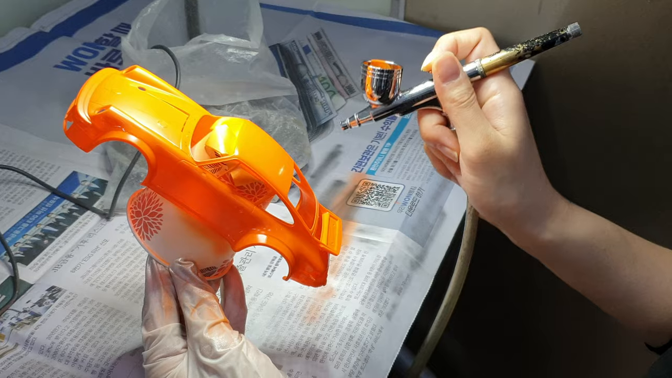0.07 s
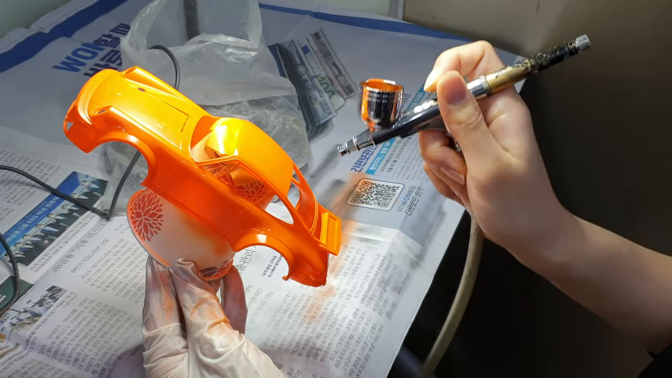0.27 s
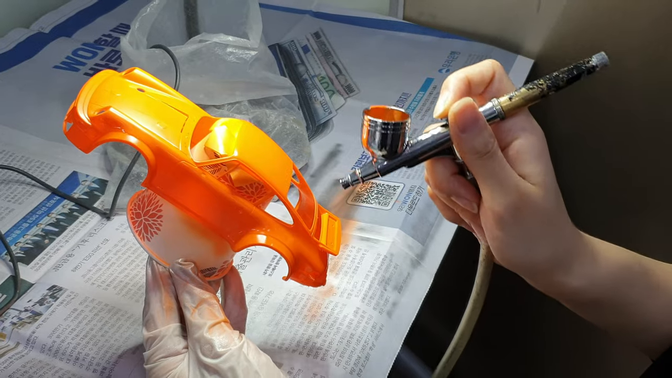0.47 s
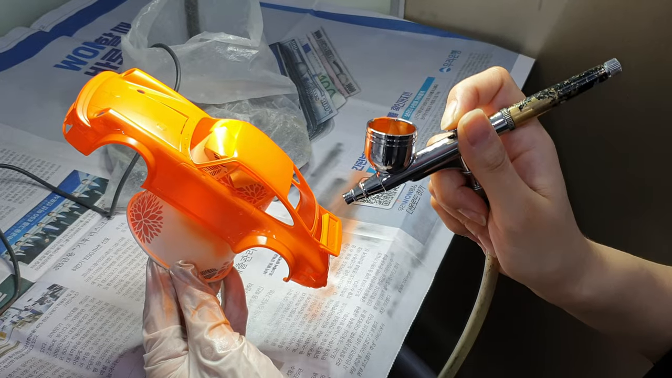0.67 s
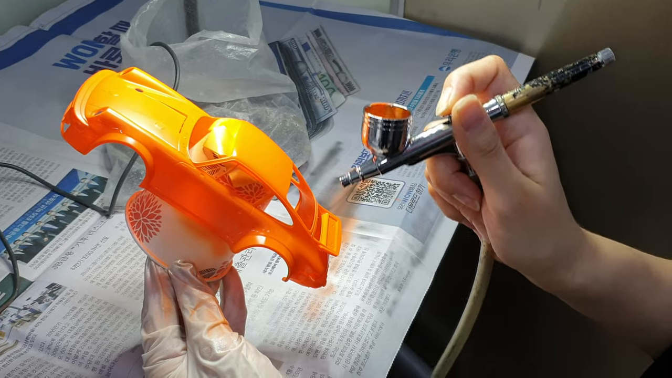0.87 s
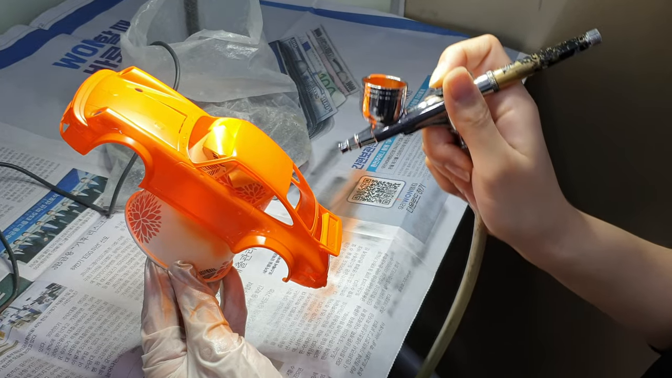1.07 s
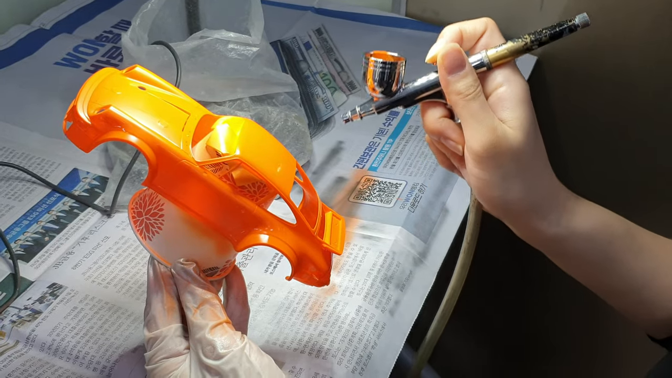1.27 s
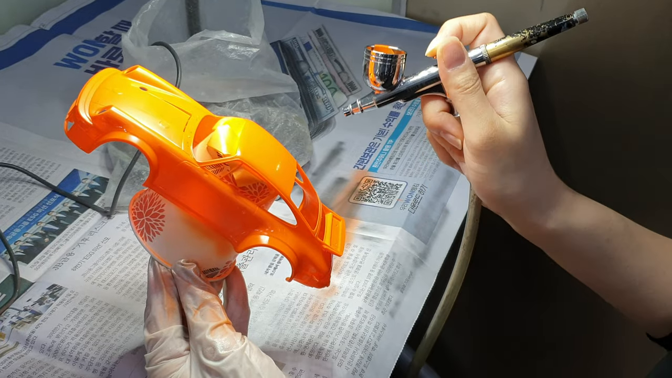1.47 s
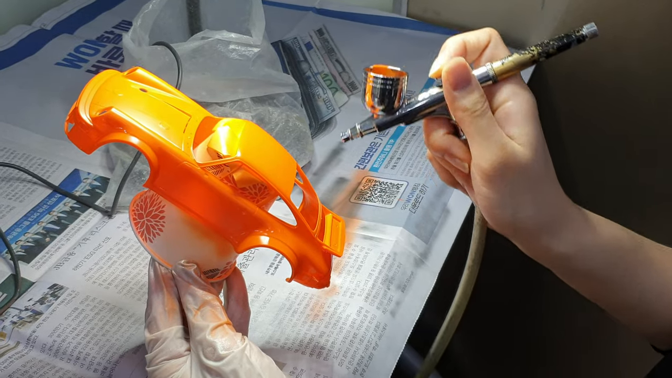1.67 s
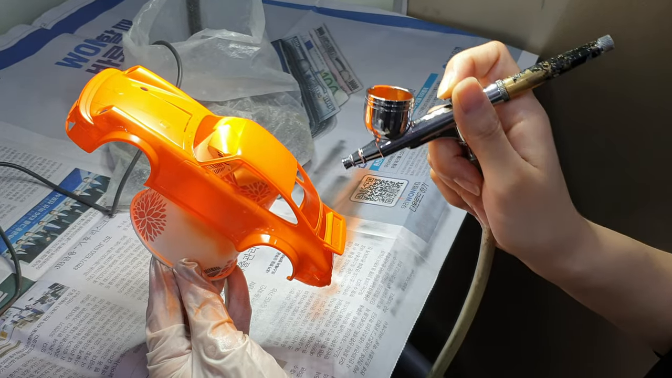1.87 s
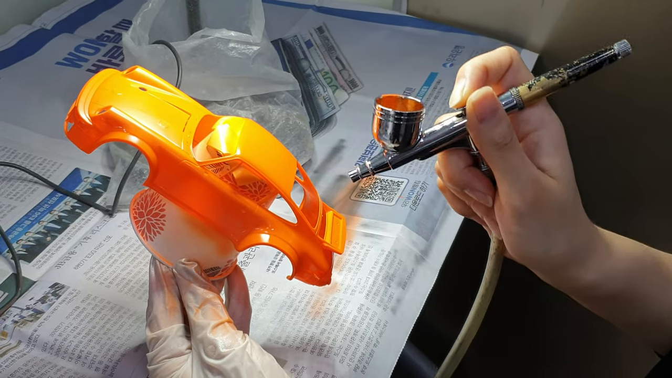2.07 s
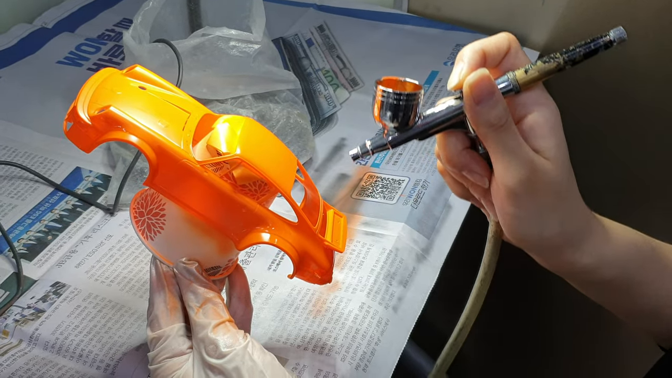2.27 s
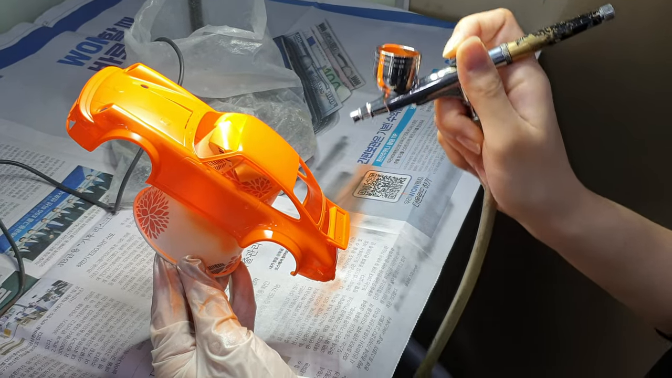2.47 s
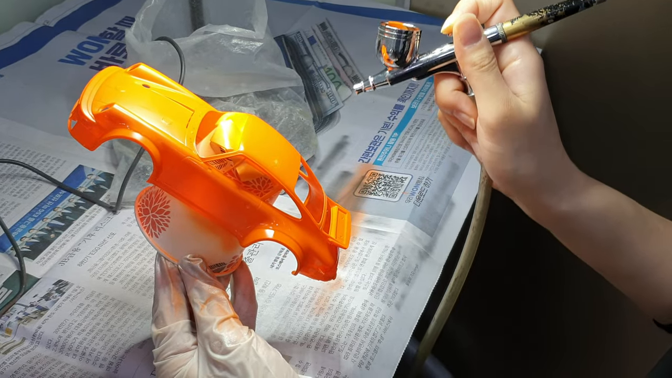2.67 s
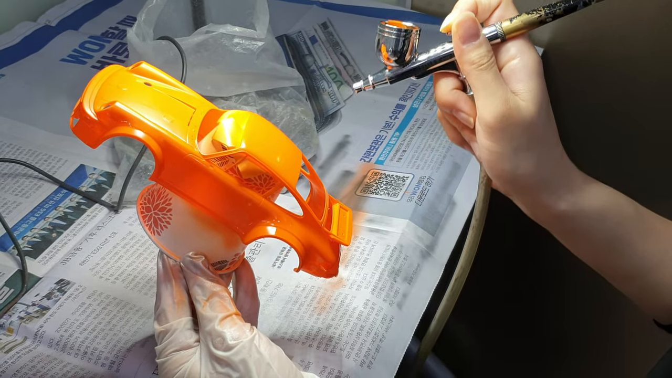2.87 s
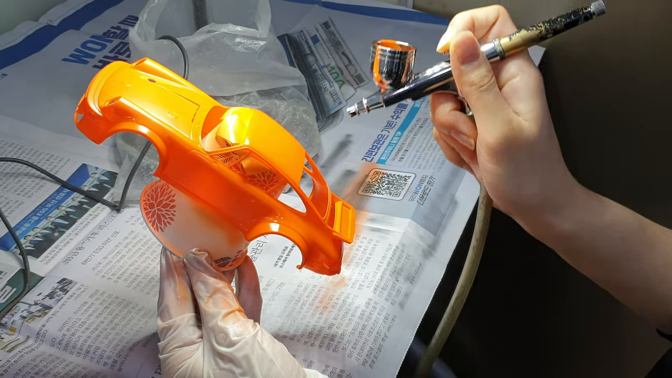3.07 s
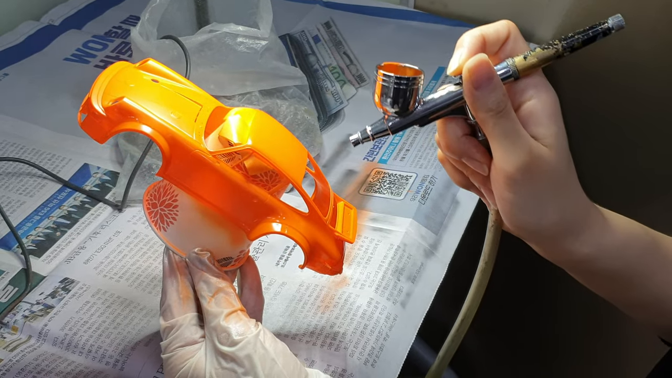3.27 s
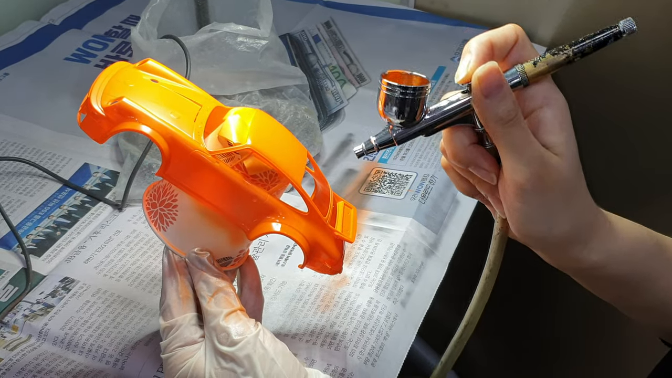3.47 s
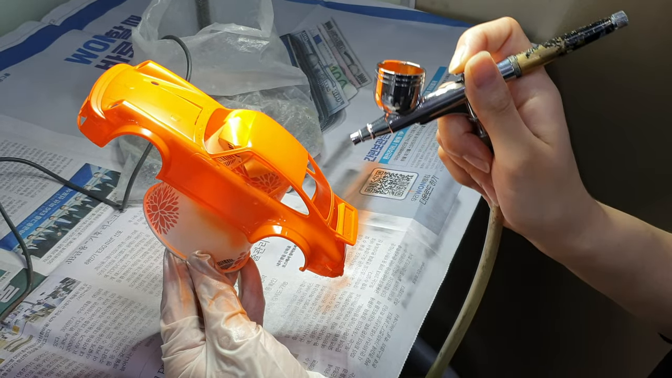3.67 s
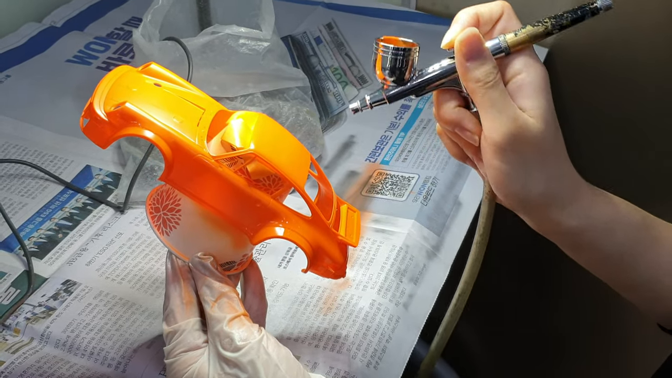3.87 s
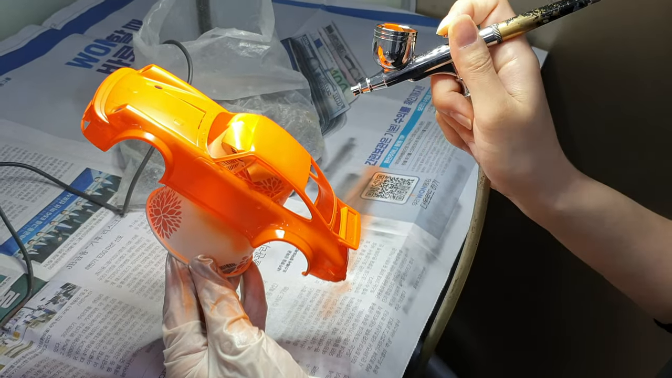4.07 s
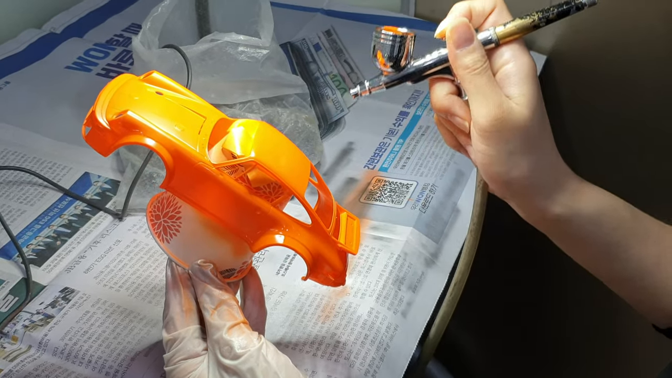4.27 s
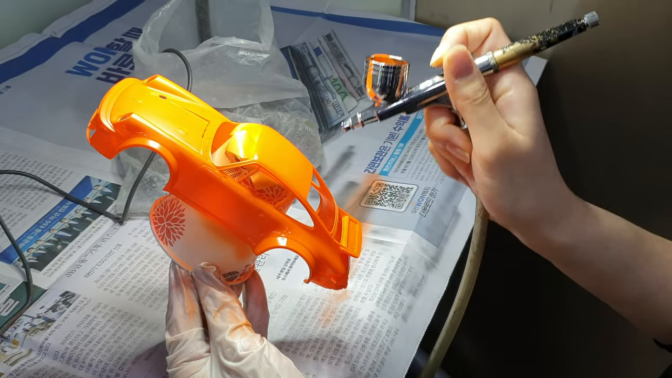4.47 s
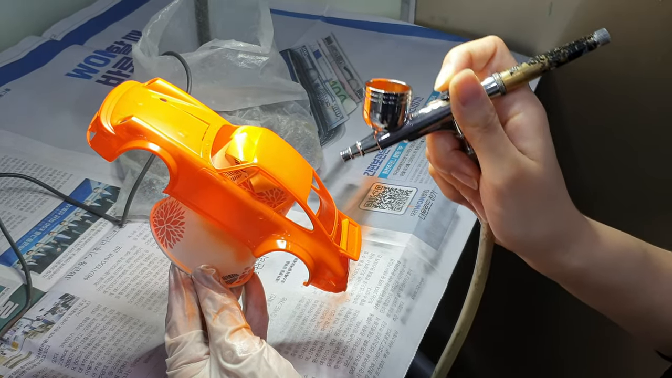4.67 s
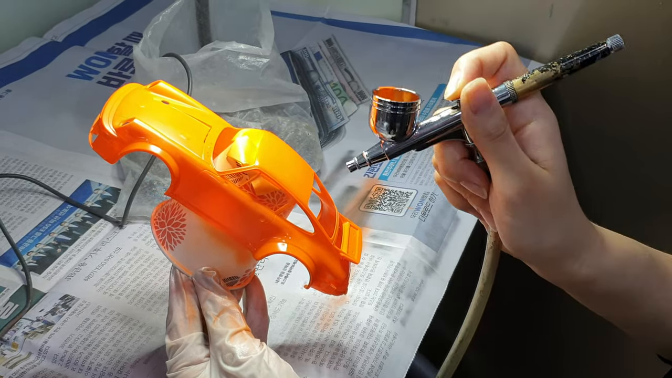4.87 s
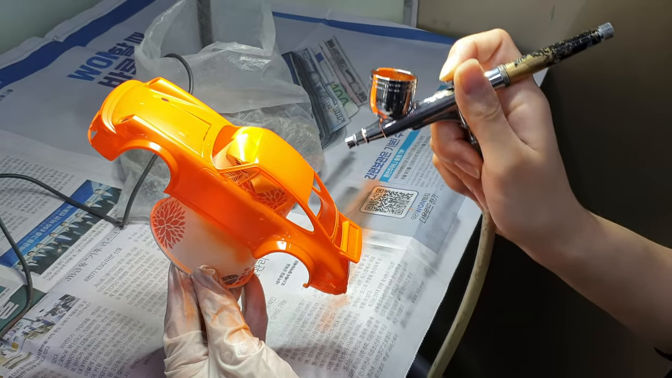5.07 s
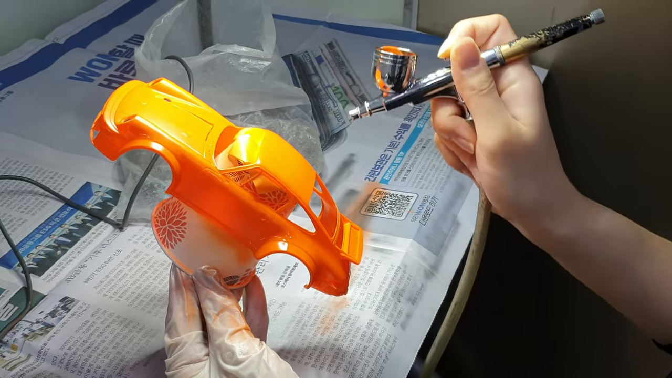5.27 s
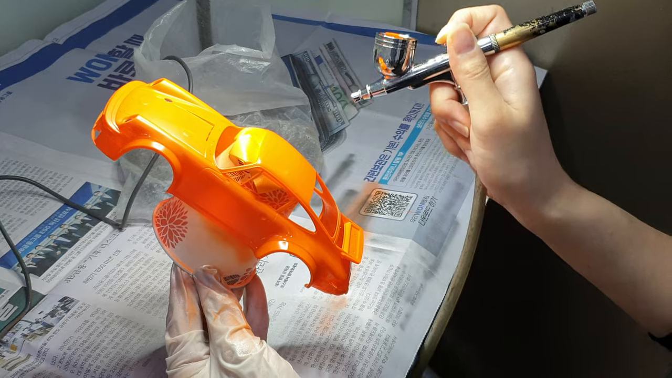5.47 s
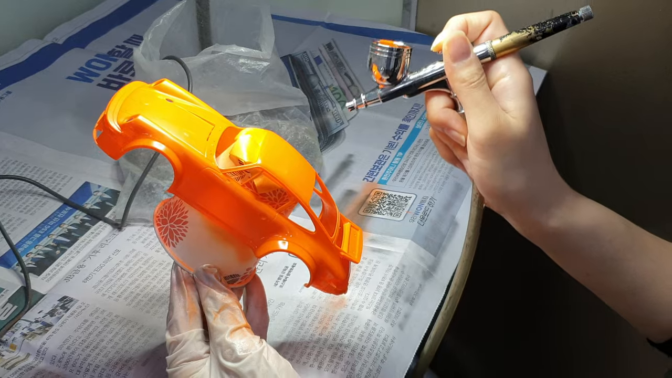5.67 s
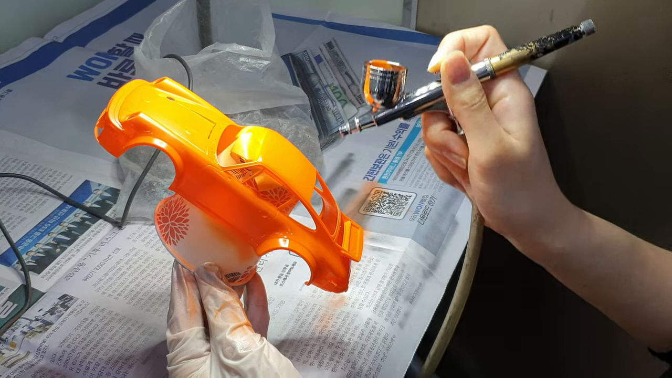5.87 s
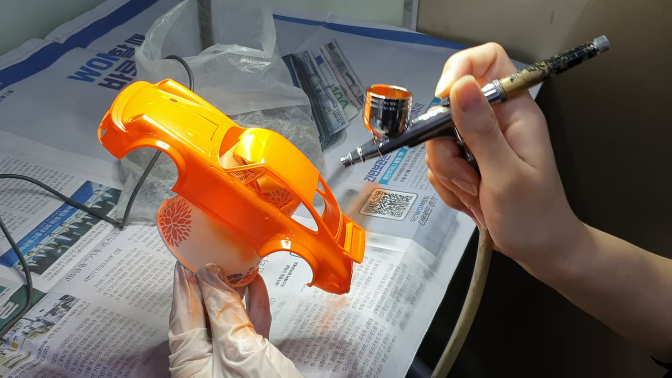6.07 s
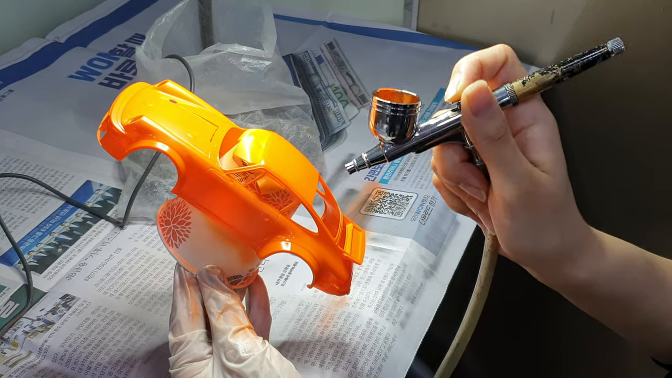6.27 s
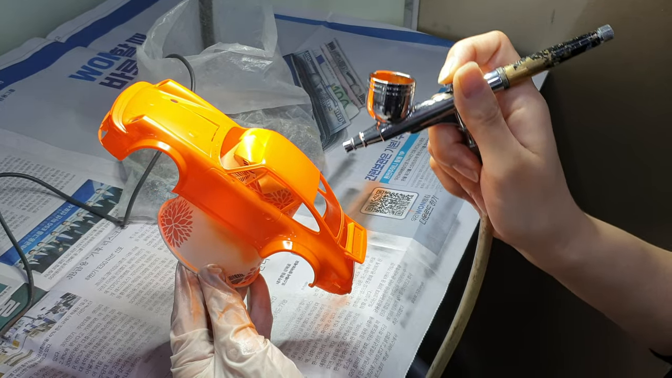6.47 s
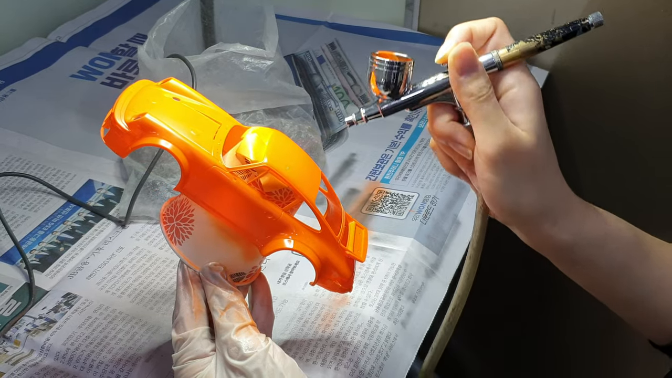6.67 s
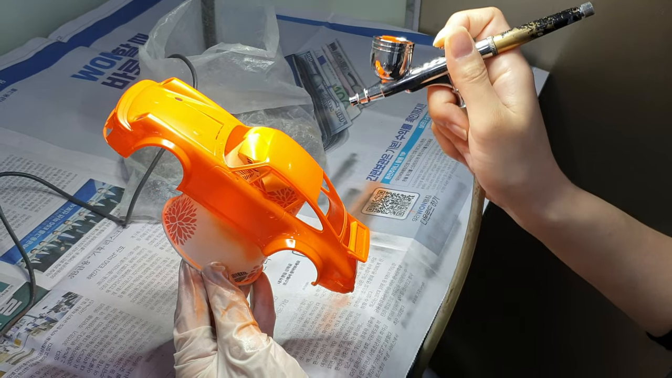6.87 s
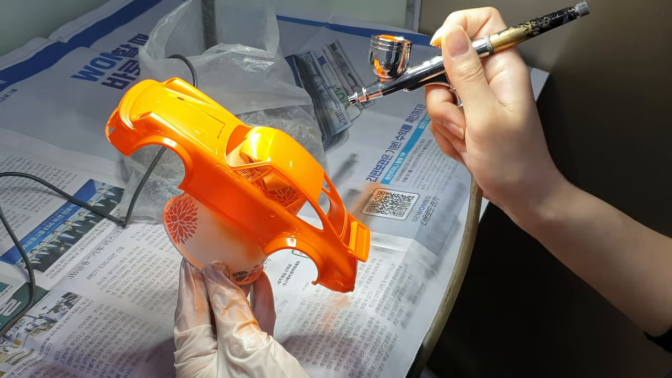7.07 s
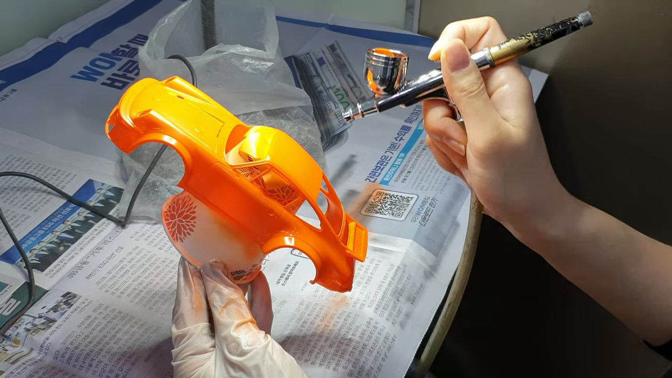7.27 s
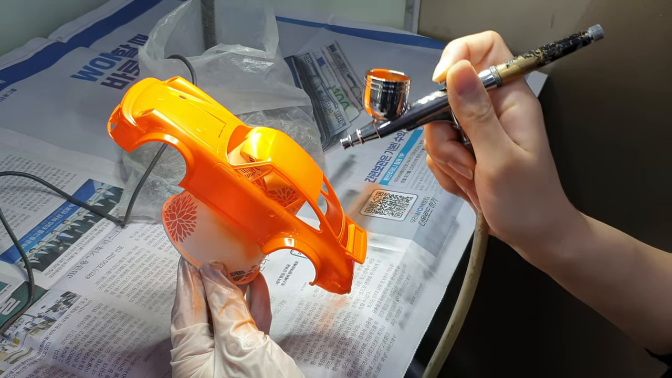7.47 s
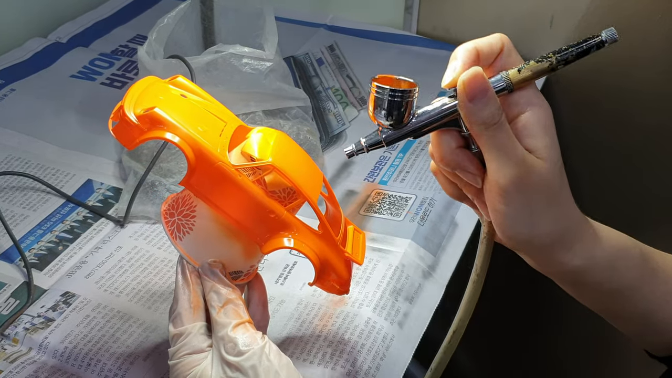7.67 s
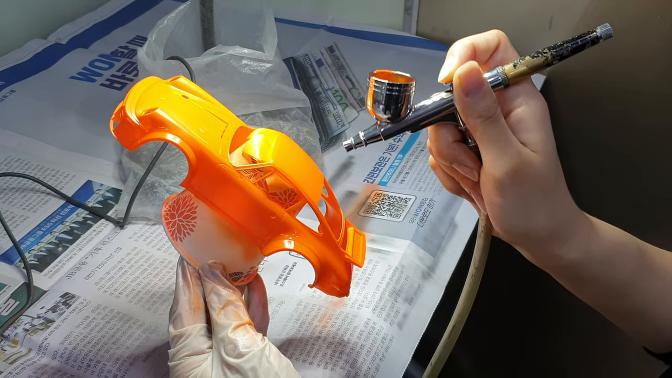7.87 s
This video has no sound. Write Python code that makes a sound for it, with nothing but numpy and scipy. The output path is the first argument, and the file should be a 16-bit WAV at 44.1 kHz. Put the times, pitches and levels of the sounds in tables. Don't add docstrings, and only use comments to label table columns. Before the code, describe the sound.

After a tiny silence, the sound begins at about 0.1 seconds, very faint: a fine airbrush hiss over motor hum. It stays low until around 1.7 seconds, then the phone's automatic gain opens, raising everything strongly until about 3.2 seconds, after which the level holds to the end near 8 seconds. The close jet is bright and extremely high, with duller air striking a plastic model and a faint papery rustle, slightly stronger near 0.5, 1.1, 4.6 and 7.5 seconds. Every 0.7 seconds or so the hand reverses, and the hiss changes colour and side with sliding, ripple-like echoes. Behind it a fast piston compressor buzzes, its pitch dipping minutely and its housing ringing up near 2, 3, 3.8, 5.3, 6 and 7.3 seconds. An extractor fan, low electrical hum and airy rumble drone steadily in the room.

```python
import sys
import numpy as np
from scipy import signal
from scipy.fft import rfft, irfft
from scipy.io import wavfile

SR = 44100
rng = np.random.default_rng(int(sys.argv[2]) if len(sys.argv) > 2 else 0)


def inscribe(sig):
    pcm = np.round(np.clip(np.atleast_2d(sig).T, -1, 1) * 32767)
    wavfile.write(sys.argv[1], SR, pcm.astype(np.int16))


def field_ratio(decibels):
    return 10 ** (np.asarray(decibels, dtype=float) / 20)


N = 349272
SIDE = np.array([[1], [-1]])


def amp_unit(x):
    return x / np.sqrt(np.mean(x ** 2) + 1e-20)


def in_time(rows):
    s, *columns = np.transpose(rows)
    return [np.interp(np.arange(N) / SR, s, c) for c in columns]


def at_hz(rows, hz, column=1):
    rows = np.array(rows)
    return np.interp(np.log(hz + 1), np.log(rows[:, 0]), rows[:, column])


def bins_hz():
    return np.arange(N // 2 + 1) * SR / N


def coloured(x, gain):
    return irfft(rfft(x) * gain, N)


def drift(rate_hz, size=40):
    r = np.exp(-2 * np.pi * size * rate_hz / SR)
    noise = rng.standard_normal(N // size + 1002)
    slow = signal.lfilter([1], [1, -2 * r, r * r], noise)[1000:]
    return np.interp(np.arange(N) / size, np.arange(len(slow)), amp_unit(slow - slow.mean()))


# (frequency [Hz], likeness [0-1], left minus right [dB])
MACHINE_IMAGE = [(60, 0.9, -5.5), (130, 1, -3), (278, 0.78, -9.5), (720, 0.71, 0), (1370, 0, -0.5),
                 (2870, 0, -3.5)]


def tone(turns, hz, db, unsteady_db):
    start, apart = rng.uniform(0, 2 * np.pi), rng.choice([-1, 1])
    shift = apart * np.arccos(np.clip(at_hz(MACHINE_IMAGE, hz), 0, 1))
    pan = at_hz(MACHINE_IMAGE, hz, column=2) / 2 * SIDE
    phase = 2 * np.pi * (turns % 1) + start + shift / 2 * SIDE
    wave = np.sin(phase.astype(np.float32))
    return field_ratio(db + pan) * wave * (1.5 + unsteady_db / 5.3 * drift(1.4, size=400))


def motor(per_s, orders, level_db, unsteady_db):
    turns = np.cumsum(per_s * np.ones(N)) / SR
    return sum(tone(k * turns, k * np.mean(per_s), db + level_db, unsteady_db) for k, db in orders)


# (multiple of the shaft rate, level [dB])
FAN_PARTIALS = [(3, -34), (4, -6.5), (16, -13), (18, -15), (19, -10), (20, -34), (21, -4), (22, -5.5),
                (23, -10), (24, -37.5)]


def extractor_fan():
    return motor(24.65, FAN_PARTIALS, -13.0, 1.1)


# (frequency [Hz], level [dB])
MOTOR_HUM = [(58.9, 1.1), (118.4, -9.5), (38.4, -18), (174, -24), (195, -24.5), (1161, -6)]


def motor_hum():
    return sum(tone(hz * np.arange(N) / SR, hz, db - 10.0, 0.52) for hz, db in MOTOR_HUM)


# (frequency [Hz], level per Hz [dB])
AIR_RUMBLE = [(30, 0), (58, 2), (120, -17), (140, -15), (300, -14), (420, -14.5), (530, -4.5), (760, -6),
              (890, -4.5), (1020, -8), (1170, -2.5), (1490, -10.5), (1710, -3.5), (2040, -11.5),
              (4500, -19.5)]


def air_rumble(per_s):
    hz = bins_hz()
    alike = np.clip(at_hz(MACHINE_IMAGE, hz), 0, 1)
    common, apart = rfft(rng.standard_normal((2, N)))
    noise = np.sqrt(1 + alike) * common + SIDE * np.sqrt(1 - alike) * apart
    pan = SIDE * at_hz(MACHINE_IMAGE, hz, column=2) / 2
    rumble = irfft(noise * field_ratio(at_hz(AIR_RUMBLE, hz) + pan), N)
    turn = 2 * np.pi * np.cumsum(per_s) / SR
    puffs = 1 + 0.091 * np.cos(turn) + 0.23 * np.cos(2 * turn)
    return field_ratio(-0.5) * amp_unit(rumble) * puffs


FULL_SPEED = 27.845
FILLING_S, FILLING_LOSS, FILLING_DB = 1.8, 0.0392, 10
SLOWING_S, RECOVERY_S, SWELL_LATE_S, SWELL_S, HOUSING_REST_DB = 0.1171, 0.244, 0.16, 0.22, -17
# (time [s], speed loss [strokes per s], held [s], housing swell on recovery [dB])
PUMP_LABOURS = [
    (1.8, 0.13, 0.0096, 11),
    (2.8, 0.12, 0, 12.5),
    (3.6, 0.14, 0.02, 12.5),
    (5.12, 0.146, 0.033, 11),
    (5.4, 0.0886, 0.677, 10.5),
    (7.15, 0.14, 0.0063, 12.5),
]


def pump_control():
    t = np.arange(0, N + 400, 400) / SR
    filling = np.clip((FILLING_S - t) / RECOVERY_S + 1, 0, 1)
    sag, swell = FILLING_LOSS * filling, FILLING_DB * filling
    for s, loss, held, db in PUMP_LABOURS:
        slowing = 1 + (t - s) / SLOWING_S
        recovering = 1 - (t - s - held) / RECOVERY_S
        sag = np.maximum(sag, loss * np.clip(np.minimum(slowing, recovering), 0, 1))
        swell = np.maximum(swell, db * np.exp(-((t - s - held - SWELL_LATE_S) / SWELL_S) ** 2))
    return in_time(np.transpose([t, FULL_SPEED - sag, HOUSING_REST_DB + swell]))


# (multiple of the stroke rate, level [dB])
PUMP_PARTIALS = [(9, -35), (12, -31), (13, -33), (14, -34), (15, -33), (16, -29), (17, -23), (18, -27),
                 (19, -20), (20, -25), (21, -28), (22, -19), (24, -16.5), (26, -20.5), (28, -26), (29, -20),
                 (30, -17), (31, -21), (32, -19), (33, -17), (34, -24), (35, -23), (36, -29), (37, -29),
                 (38, -28), (39, -23), (40, -30), (41, -19), (42, -23), (43, -26), (44, -27), (45, -34),
                 (46, -28), (47, -29), (48, -31), (50, -33), (61, -34), (63, -33)]


def compressor(per_s, housing_db):
    housing = field_ratio(housing_db) * motor(per_s, [(25, 0), (32, -9.0)], 0.87, 0.25)
    labour = field_ratio(112 * (FULL_SPEED - per_s)) * motor(per_s, [(23, -29), (27, -34)], 1.3, 1.4)
    pump = motor(per_s, PUMP_PARTIALS, 3.7, 1.74)
    thud = motor(per_s, [(2, -16), (3, -3), (4, -5.0)], -23.5, 8.5)
    return housing + labour + pump + thud


def machines():
    per_s, housing_db = pump_control()
    return compressor(per_s, housing_db) + extractor_fan() + motor_hum() + air_rumble(per_s)


SHADOW_HEIGHT, SHADOW_WIDTH = 0.34, 0.15
FLICK = 3.5
# (time [s], height [0-1], nozzle aim towards the phone [dB],
# shadow on the stroke that follows [dB])
HAND_STROKES = [(0, 0.5, 10, 0), (.1, 0.8, 2.5, 5), (.75, 0.06, 7, 8), (1.45, 0.89, 5, 5.5),
                (2.15, 0.1, 2, 6), (2.85, 0.74, 1.5, 6), (3.55, 0.08, 4.5, 6), (4.25, 0.95, 4.5, 4),
                (4.9, 0.12, 3.5, 5.5), (5.6, 0.94, 4, 3), (6.3, 0.05, 5.5, 3.5), (7.1, 0.97, 7, 4.5),
                (7.8, 0.05, 6, 0), (8.2, 0.7, 4, 0)]


def hand():
    s, height, aim_db, shadow_db = np.transpose(HAND_STROKES)
    turns = np.arange(len(s))
    step = np.interp(np.arange(N) / SR, s, turns)
    along = step % 1
    eased = np.floor(step) + .5 - .5 * np.cos(np.pi * along)
    height = np.interp(eased, turns, height)
    shadow_db = shadow_db[step.astype(int)] * np.exp(-((height - SHADOW_HEIGHT) / SHADOW_WIDTH) ** 2)
    flick = np.floor(step) + np.clip(.5 + FLICK * (along - .5), 0, 1)
    return height, np.interp(flick, turns, aim_db), np.sin(np.pi * along), shadow_db


HISS_DB, BEAM_DB, SPLASH_DB, RUSTLE_DB = 3.5, 3.5, -3.5, -15
HISS_PAN_DB, SPLASH_PAN_DB = 2.2, -9
HISS_AIM, HISS_SHADE, BEAM_SHADE = 0.08, 0.14, 0.6
FLOW_DB = 0.66
BEAM_LEAN = 1
BEAM_HIGH_DB, SPLASH_HIGH_DB, RUSTLE_HIGH_DB = -1, 0.1, 2.5
RUSTLE_MOVING_DB = 0.5
TURNING_DB_PER_S = 0.55
GUST_S = 0.094
# (time [s], level [dB])
PAPER_GUSTS = [(.48, 2), (1.08, 4.3), (4.55, 1.6), (7.5, 1.1)]


def jet_levels(height, aim_db, speed, shadow_db):
    t = np.arange(N) / SR
    turning = shadow_db + TURNING_DB_PER_S * t
    gusts = sum(db * np.exp(-((t - s) / GUST_S) ** 2) for s, db in PAPER_GUSTS)
    hiss = HISS_DB + HISS_AIM * aim_db - HISS_SHADE * shadow_db + FLOW_DB * drift(3.9, size=400)
    beam = BEAM_DB + 0.62 * aim_db + BEAM_HIGH_DB * height / 2 - BEAM_SHADE * shadow_db
    splash = SPLASH_DB + SPLASH_HIGH_DB * height - turning / 2
    rustle = RUSTLE_DB + RUSTLE_HIGH_DB * height + RUSTLE_MOVING_DB * speed + gusts
    beam_pan = 2.5 - BEAM_LEAN * aim_db + BEAM_HIGH_DB * height
    return hiss, beam, splash, rustle, HISS_PAN_DB, beam_pan, SPLASH_PAN_DB + turning


def turbulence():
    hiss = rng.standard_normal(N) * field_ratio(0.21 * drift(32.0) + 0.49 * drift(39.0))
    return irfft(rfft(hiss), 6 * N) * 6


def arrive(fine, paths, late, height):
    heard = field_ratio(-7.5) * rng.standard_normal(N)
    for high_ms, low_ms, db in paths:
        lag_high, lag_low = high_ms + late[0], low_ms + late[1]
        lag_ms = lag_low + (lag_high - lag_low) * height
        lag_ms = lag_ms + .014 * low_ms * drift(.9, size=400)
        strength = field_ratio(db + .28 * db * drift(1.2, size=400))
        place = (6 * (np.arange(N) - lag_ms * SR / 1000)).astype(int)
        heard = heard + strength * fine[place % len(fine)]
    return heard


# (hand high [ms], hand low [ms])
NOZZLE_LAG, SPLASH_LAG = (.25, .27), (-.18, .11)
# (delay with hand high [ms], delay with hand low [ms], level [dB])
LEFT_ECHOES = [(.01, .01, 0), (.34, .3, -13), (.68, .73, -13), (1.13, 1.09, -13), (1.6, 1.75, -13),
               (1.76, 1.93, -12), (2.12, 2.45, -10), (2.35, 2.75, -12), (2.85, 3.25, -15), (3.5, 4.02, -14),
               (4.3, 4.9, -16), (5.6, 6.3, -17)]
RIGHT_ECHOES = [(.01, .01, 0), (.48, .57, -9), (.28, .33, -14), (.8, .9, -14), (1.3, 1.5, -16),
                (2.1, 2.37, -12), (2.25, 2.6, -14), (2.52, 2.83, -13), (2.8, 3.2, -12), (3.2, 3.55, -15),
                (4.1, 4.7, -16), (5.1, 5.8, -17)]
# (frequency [Hz], left level per Hz [dB], right level per Hz [dB])
JET_SPECTRUM = [(493, -19, -36), (1190, -18, -22.5), (2060, -20, -21.5), (2693, -16, -13.5),
                (3280, -23, -41), (4450, -14.5, -21), (4830, -12, -11), (5900, -17, -6.5), (7130, -3, -8.5),
                (7930, -9.5, -23), (9680, -24.5, -11), (10800, -13, -11.5), (12200, -12, -7.5),
                (14070, 2.5, 5.5), (15700, 11.5, 4.5)]


def jet():
    height, *pose = hand()
    hiss_db, beam_db, splash_db, rustle_db, hiss_pan, beam_pan, splash_pan = jet_levels(height, *pose)
    nozzle, spot = turbulence(), turbulence()
    hz, out = bins_hz(), []
    low = 1 / (1 + (hz / 4500) ** 8)
    high = 1 / (1 + (9000 / (hz + 1)) ** 12)
    top = 1 / (1 + (12600 / (hz + 1)) ** 16)
    for port, paths in enumerate((LEFT_ECHOES, RIGHT_ECHOES)):
        from_nozzle = arrive(nozzle, paths, port * np.array(NOZZLE_LAG), height)
        from_spot = arrive(spot, paths, port * np.array(SPLASH_LAG), height)
        colour, side = field_ratio(at_hz(JET_SPECTRUM, hz, column=port + 1)), .5 - port
        beam = field_ratio(beam_db + side * beam_pan - 0.5) * amp_unit(coloured(from_nozzle, colour * top))
        bright = amp_unit(coloured(from_nozzle, colour * (high - top)))
        hiss = field_ratio(side * hiss_pan + 4.0) * (bright + beam)
        splash = amp_unit(coloured(from_spot, colour * (1 - low - high)))
        splash = field_ratio(splash_db + side * splash_pan + 0.5) * splash
        rustle = field_ratio(rustle_db + 4.0 - side * 1.1) * amp_unit(coloured(from_spot, colour * low))
        out.append(field_ratio(hiss_db) * (hiss + splash + rustle))
    return np.array(out)


# (time [s], level [dB])
PHONE_GAIN = [
    (0.07, -60.5),
    (0.8, -60.5),
    (1.03, -58),
    (1.72, -58.5),
    (2.3, -48.5),
    (2.8, -43.5),
    (3.2, -42),
    (7.9, -42.5),
]


def scene():
    return field_ratio(in_time(PHONE_GAIN)[0]) * (jet() + machines())


def top_cut(x):
    return signal.sosfilt(signal.butter(12, 17100, fs=SR, output="sos"), x)


def record(dry):
    opened = np.clip((np.arange(N) / SR - 0.07) / 0.0011, 0, 1)
    hz = bins_hz()
    passed = np.clip((15770 - hz) / 60, 0, 1) / (1 + (40 / (hz + 1)) ** 4)
    return top_cut(opened * coloured(dry, passed))


dry = scene()
out = record(dry)
inscribe(out)
```